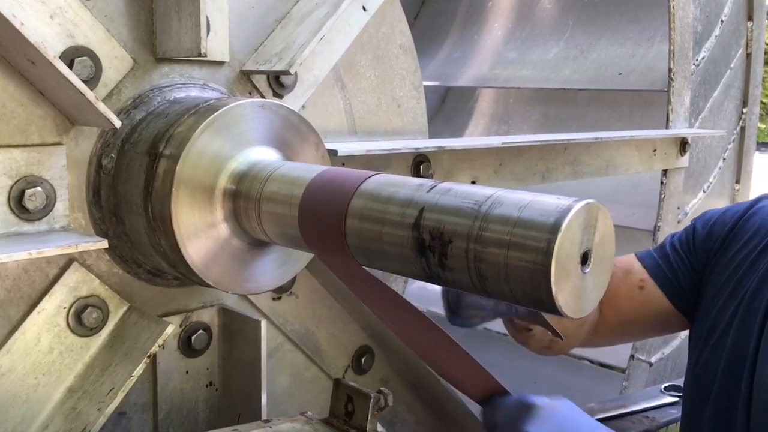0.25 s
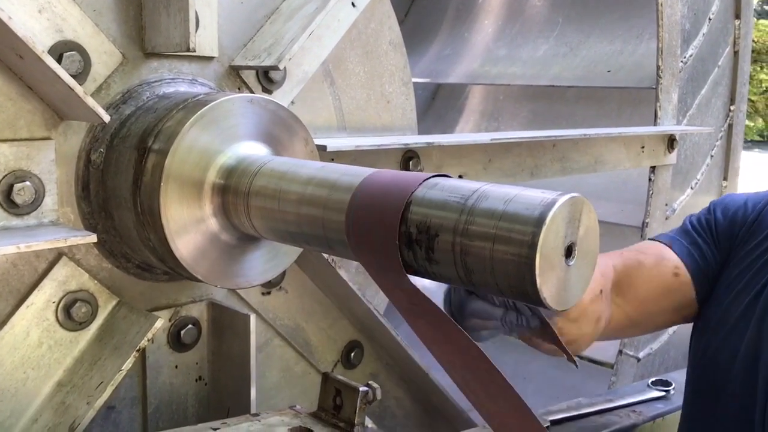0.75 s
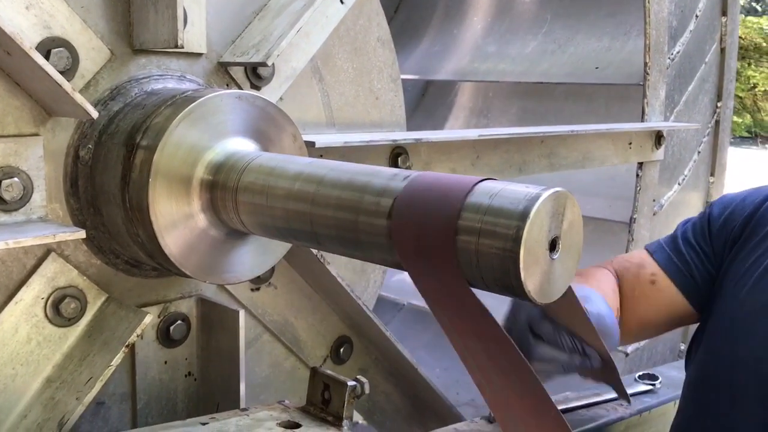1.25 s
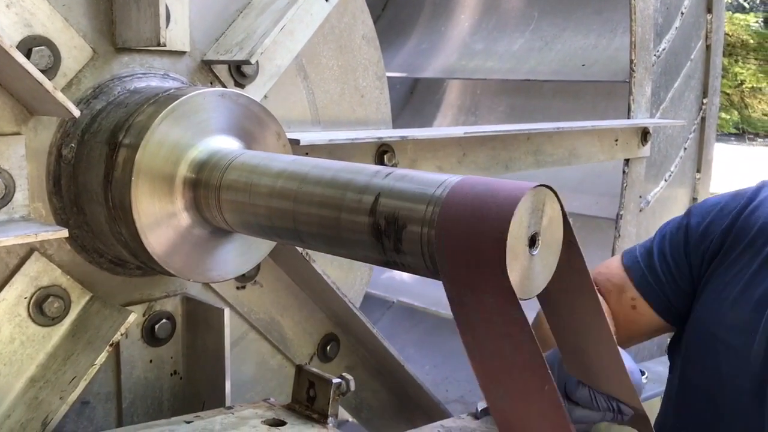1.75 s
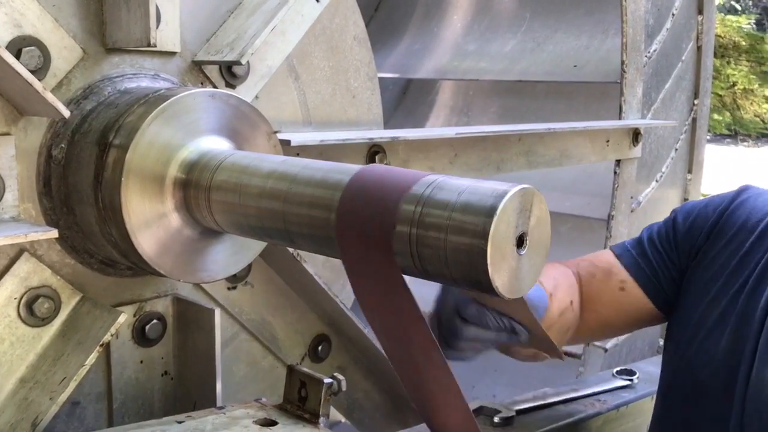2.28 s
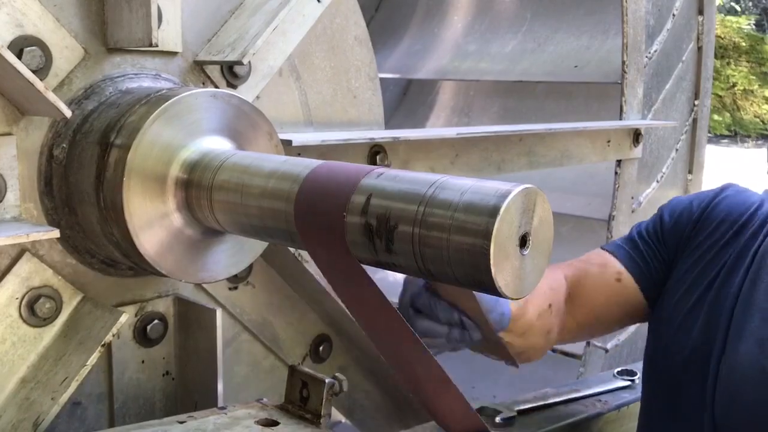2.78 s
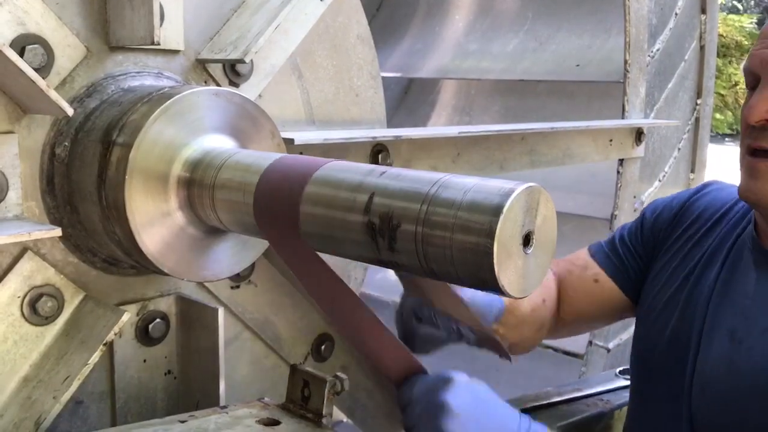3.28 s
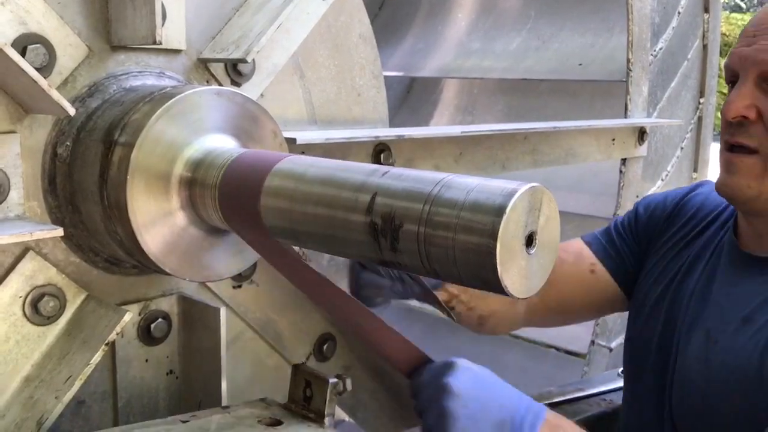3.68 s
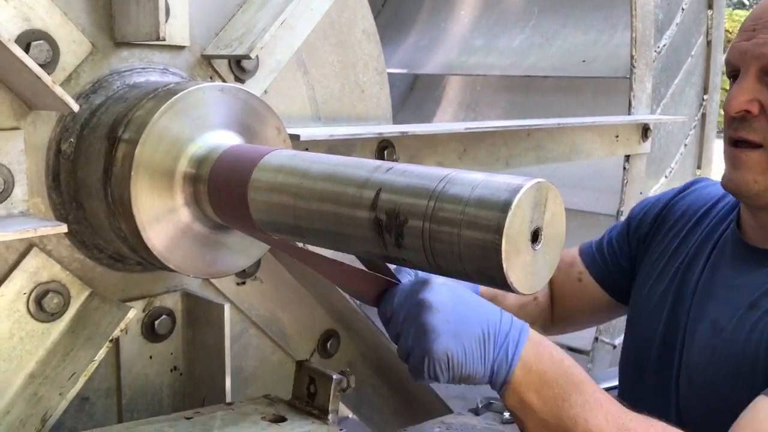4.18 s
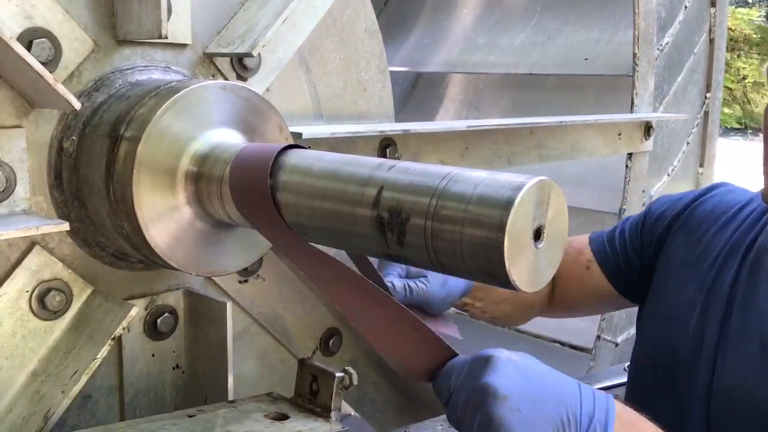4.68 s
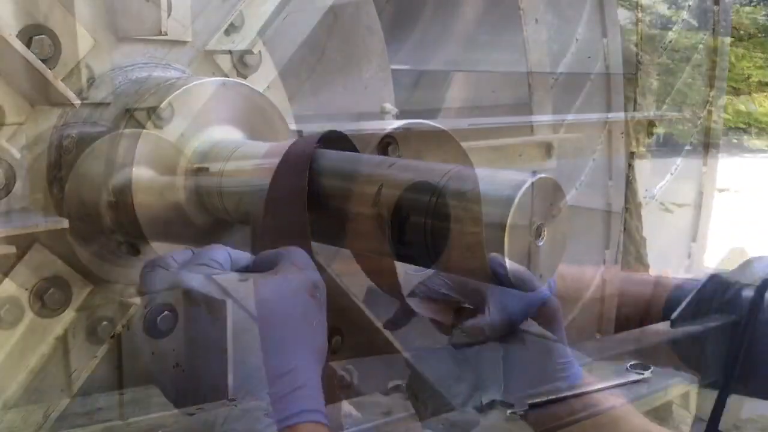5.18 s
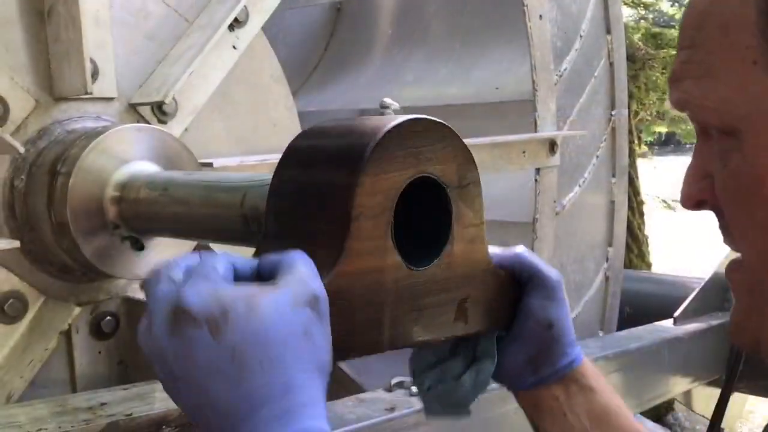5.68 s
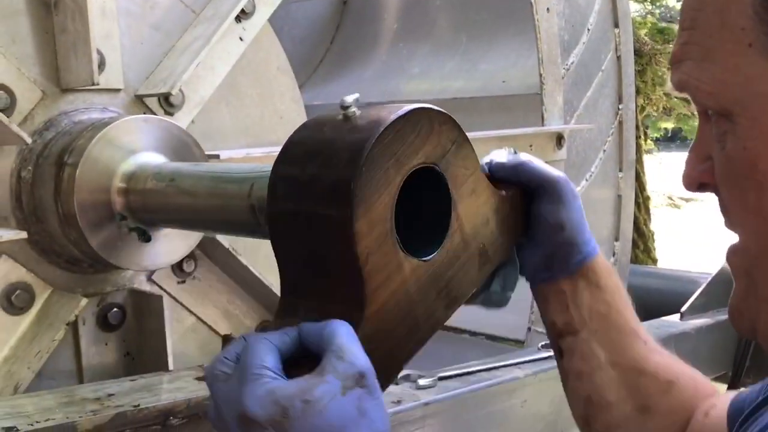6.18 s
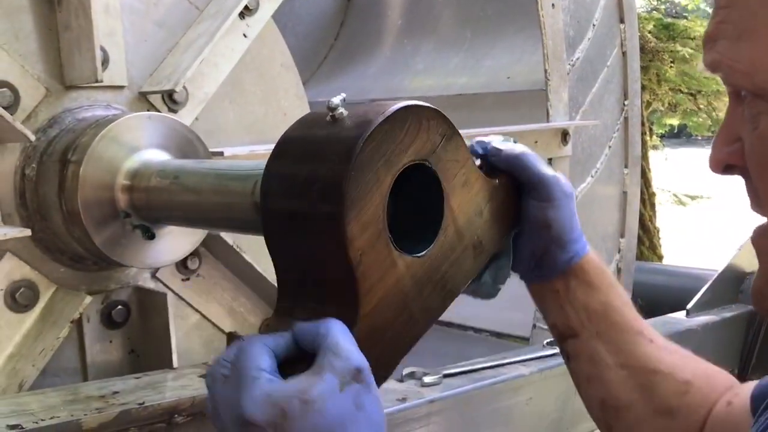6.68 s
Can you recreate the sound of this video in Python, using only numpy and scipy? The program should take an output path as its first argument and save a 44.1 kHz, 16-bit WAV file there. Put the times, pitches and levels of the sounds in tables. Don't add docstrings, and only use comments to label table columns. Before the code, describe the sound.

Outdoors and close up, sanding is already under way at 0 seconds: emery cloth drawn back and forth round a steel shaft. Each dry stroke lasts about 0.2 seconds, with tiny gaps at the turns, giving roughly five rasps per second. Fine grit fizzes brightly, the contact rasps, and the taut strip drums around 3 kHz; hard pulls add brief hums and rings, notably near 0.9, 2.1 and 3.5 seconds. The steel frame adds a very short echo. Strokes become gradually lighter and uneven until 4.55. A last, longer scrape swells around 4.7 and dies by 4.95. Running water, a steady broad wash underneath throughout, is then exposed. Small wind bumps come at 5.1 to 5.7, with faint glove rubs near 5.55, 5.8 and 6.1. Stronger low puffs buffet the microphone from 6.3 to 6.8, while the water continues to the end, near 6.9.

```python
import sys
import numpy as np
from scipy import signal
from scipy.fft import rfft, irfft
from scipy.io import wavfile
from scipy.ndimage import uniform_filter1d

SR = 44100
rng = np.random.default_rng(int(sys.argv[2]) if len(sys.argv) > 2 else 0)


def linear_from_db(decibels):
    return 10 ** (np.asarray(decibels, float) / 20)


def dump(signal):
    limited = np.clip(np.atleast_2d(signal).T, -1, 1)
    pcm = np.round(limited * 32767).astype(np.int16)
    wavfile.write(sys.argv[1], SR, pcm)


N = 306046


def evened(x):
    return x / np.sqrt(np.mean(x ** 2) + 1e-20)


def read(points, hz):
    f, value = np.transpose(points)
    return np.interp(np.log(hz + 1), np.log(f + 1), value)


def coloured(x, points):
    gain = linear_from_db(read(points, np.fft.rfftfreq(len(x), 1 / SR)))
    return evened(irfft(rfft(x) * gain, len(x)))


def patchy(x, db, bins, frames):
    z = signal.stft(x, nperseg=512, noverlap=384)[2]
    field = rng.standard_normal(z.shape)
    for _ in range(2):
        field = uniform_filter1d(field, bins, 0)
        field = uniform_filter1d(field, frames, 1)
    z = z * linear_from_db(db * evened(field))
    return evened(signal.istft(z, nperseg=512, noverlap=384)[1][:len(x)])


def resonate(x, hz, width):
    turn = np.exp(2j * np.pi * np.cumsum(hz * np.ones(len(x))) / SR)
    r = np.exp(-np.pi * width / SR)
    return 2 * (turn * signal.lfilter([1 - r], [1, -r], x / turn + 1e-18)).real


def bursts(x, rows, glide=0.):
    out = np.zeros(N)
    for s, length, db, hz, width in rows:
        span = slice(round(s * SR), round((s + length) * SR))
        path_hz = hz * (1 + glide * np.linspace(0, 1, len(x[span])))
        once = resonate(x[span], path_hz, width)
        spell = evened(resonate(once, path_hz, width))
        out[span] += linear_from_db(db) * spell * signal.windows.tukey(len(spell), .6)
    return out


def grit(per_s, spread_db):
    size = linear_from_db(spread_db * np.minimum(rng.exponential(1, N), 5)) * rng.choice([-1., 1.], N)
    return evened(size * (rng.random(N) < per_s / SR))


def hands():
    # start in seconds, end in seconds, sliding speed in dB, lean in dB from start to end,
    # jerk in dB at the start (+ breaks loose, - eases in).
    strokes = [(0.037, 0.227, -20.5, -10.5, -14.7), (0.248, 0.44, -24.6, 2, -8.5),
               (0.4647, 0.6415, -22.5, -5.5, 3.5), (0.66, 0.8506, -26.5, 1, -11),
               (0.8765, 1.053, -23.5, -6, 1.5), (1.067, 1.24, -23.0, -5, -13),
               (1.27, 1.463, -20, -10.5, -11), (1.4705, 1.6535, -28, -2, -12),
               (1.6774, 1.867, -25.3, -7, 0.5), (1.882, 2.0506, -26.5, 4, -5), (2.0797, 2.271, -30, 3, 11),
               (2.296, 2.459, -25.5, 1, 1.5), (2.4953, 2.6913, -29.5, -2.5, -13),
               (2.7075, 2.869, -28.8, -0.5, 4.5), (2.902, 3.082, -31.5, 0, -12.5),
               (3.102, 3.2754, -29.5, 3.5, 7), (3.309, 3.501, -33, 3.7, 9.1),
               (3.5224, 3.7129, -30.5, -1, 10.5), (3.736, 3.923, -34, 10, 2), (3.95, 4.123, -31.5, -3.8, 7),
               (4.152, 4.343, -29, -9.5, -20.2), (4.3654, 4.5512, -32, -4, -12)]
    # centre in seconds, half length in seconds, tension in dB,
    # strip resonance in Hz.
    tugs = [(0.0, 0.092, -29.5, 3100), (0.42, 0.018, -35.5, 3350), (0.48, .02, -30, 2870),
            (.52, 0.079, -32.5, 3040), (.683, 0.011, -37, 3390), (0.834, 0.014, -45, 3450),
            (.894, 0.036, -29.5, 3440), (1.278, 0.032, -29.5, 3420), (1.393, 0.071, -35, 3700),
            (1.494, 0.012, -39, 3230), (1.682, 0.032, -36, 3820), (1.842, 0.082, -39, 3820),
            (2.052, 0.034, -27, 3050), (2.096, 0.035, -24.5, 3450), (2.27, 0.028, -33.5, 2880),
            (2.316, 0.022, -28, 3200), (2.382, 0.081, -31, 3260), (2.517, .015, -37, 3540),
            (2.67, 0.028, -42, 2810), (2.761, 0.069, -30, 3230), (3.074, 0.023, -52, 3300),
            (3.186, .088, -30.5, 2980), (3.317, 0.024, -28, 2830), (3.48, 0.023, -47, 2980),
            (3.56, 0.051, -30.5, 3000), (3.923, 0.02, -32, 2650), (3.957, 0.021, -30.5, 3470),
            (4.175, 0.013, -41, 3500), (4.311, 0.024, -41.5, 3600), (4.382, 0.03, -37.5, 3000)]
    # time in seconds, sliding speed in dB, tension in dB,
    # strip resonance in Hz.
    last_stroke = [
        (4.593, -71, -65, 3400),
        (4.61, -41, -39.5, 3380),
        (4.654, -29.5, -36.5, 3350),
        (4.746, -27, -30.5, 2920),
        (4.792, -33, -31, 2840),
        (4.855, -45, -35.5, 2540),
        (4.885, -53, -48.5, 2500),
        (4.944, -51, -56, 2500),
        (4.97, -85, -75, 2500),
    ]
    set_off_s, stop_s, jerk_s, edge_power = 0.0074, 0.0085, 0.036, 2.92
    set_off_per_jerk = 0.021
    stick_s_per_jerk = 0.00039
    stop_per_lean = 0.09
    slack_db, slack_share, slack_hz = -30.5, 0.34, 3300
    tug_shape, tug_edge = 2.3, 0.18
    creep_db = -34.5

    t = np.arange(N) / SR
    s, last_speed, last_pull, last_hz = np.transpose(last_stroke)
    speed_db = np.interp(t, s, last_speed, -120, -120)
    edge_db = np.full(N, -400.)
    for start, end, db, lean_db, jerk_db in strokes:
        span = slice(round(start * SR), round(end * SR))
        since = t[span] - t[span][0]
        rise_s = set_off_s * np.exp(-set_off_per_jerk * max(jerk_db, 0))
        fall_s = stop_s * np.exp(-stop_per_lean * lean_db)
        edges = (1 - np.exp(-since / rise_s)) * (1 - np.exp((since - since[-1]) / fall_s))
        edges = edges * np.clip((since - stick_s_per_jerk * jerk_db) / .002, 0, 1)
        edge_db[span] = edge_power * 20 * np.log10(edges + 1e-3)
        lean = lean_db * (since / since[-1] - .5)
        speed_db[span] = db + lean + jerk_db * np.exp(-since / jerk_s) + edge_db[span]
    creep = uniform_filter1d(linear_from_db(speed_db) ** 2, size=2600) * linear_from_db(creep_db) ** 2

    pull = linear_from_db(slack_share * speed_db + slack_db) ** 2 * (edge_db > -400)
    hz = pull * slack_hz
    for centre, half, db, tug_hz in tugs:
        tug = linear_from_db(db + tug_edge * edge_db) ** 2 * np.exp(-abs((t - centre) / half) ** tug_shape)
        pull = pull + tug
        hz = hz + tug * tug_hz
    last = linear_from_db(np.interp(t, s, last_pull, -120, -120)) ** 2
    hz = hz + last * np.interp(t, s, last_hz)
    pull = pull + last
    return 10 * np.log10(linear_from_db(speed_db) ** 2 + abs(creep)), 10 * np.log10(pull), hz / pull


def emery():
    # frequency in Hz, level in dB per Hz.
    fizz_spectrum = [(5880, -45), (10000, -0.5), (10400, 0), (13000, 8.5), (15100, 8.5), (15600, 4.5)]
    rasp_spectrum = [(2820, -44), (4800, -11.5), (5310, -3), (7720, 0.5), (8830, 1.5), (10500, -2.5),
                     (13600, -14), (22000, -120)]
    strip_spectrum = [(650, -45), (1100, -7.5), (1610, -5.5), (1980, -3), (2140, -4), (3380, -4),
                      (4380, -3), (5000, -2), (6500, -15), (11000, -120)]
    # start in seconds, length in seconds, level in dB,
    # pitch in Hz.
    hum_rows = [(.1, 0.077, -50, 1890), (0.472, 0.09, -52, 2200), (0.877, 0.042, -43, 1220),
                (1.31, 0.15, -52, 1650), (1.99, .06, -52, 2000), (2.086, .06, -45, 1930),
                (2.31, 0.13, -51, 2230), (2.724, 0.092, -63, 2000), (3.12, 0.19, -52, 2040),
                (3.54, 0.077, -38, 2530), (4.723, 0.16, -47, 2450)]
    # start in seconds,
    # length in seconds, level in dB, pitch in Hz.
    ring_rows = [(0.035, 0.057, -40, 3800), (.06, .1, -41, 8700), (0.473, .08, -33, 8700),
                 (0.883, 0.075, -41, 3270), (.885, .06, -33, 8800), (1.268, 0.067, -38, 3350),
                 (1.29, .12, -48, 12600), (2.003, .05, -48, 3400), (2.088, 0.039, -39, 3600),
                 (2.09, 0.057, -29.5, 8850), (2.3, 0.14, -37, 8500), (2.718, 0.083, -35, 5120),
                 (2.72, 0.092, -39, 8950), (3.115, 0.17, -40, 8750), (3.12, 0.16, -36, 11900),
                 (3.152, 0.11, -43, 3350), (3.53, .03, -38, 11800), (3.56, .09, -42, 8850),
                 (3.57, .09, -37, 12300), (3.952, .04, -29, 11600), (3.952, 0.033, -39, 9400),
                 (4.65, .1, -35, 12400), (4.75, 0.083, -39.5, 4260), (1.28, .1, -38, 5900),
                 (2.078, 0.046, -38, 5500), (.07, 0.11, -35, 12300), (3.877, .045, -44, 2460),
                 (3.83, .08, -40, 13000), (4.606, 0.087, -46, 3280)]
    rasp_share, rasp_offset_db = 0.51, 0.26

    speed_db, pull_db, tension_hz = hands()
    fine = grit(per_s=24000, spread_db=2.4)
    coarse = grit(per_s=140, spread_db=-3.0)
    flutter = evened(uniform_filter1d(rng.standard_normal(N), size=300))
    clicks = (fine + .09 * coarse) * linear_from_db(0.79 * flutter)

    fizz = patchy(coloured(clicks, fizz_spectrum), db=1.5, bins=5, frames=10)
    rasp = patchy(coloured(clicks, rasp_spectrum), db=1.0, bins=3, frames=12)
    broad = evened(resonate(clicks, tension_hz, 1370.0)) * 1.38
    narrow = evened(resonate(clicks, tension_hz, 120.)) * 0.028
    drum = patchy(coloured(clicks + broad + narrow, strip_spectrum), db=2.4, bins=2, frames=10)
    rasp_db = rasp_share * speed_db + (1 - rasp_share) * pull_db + rasp_offset_db

    hums = bursts(clicks, [(*row, 350.) for row in hum_rows])
    rings = bursts(clicks, [(*row, 0.12 * row[3]) for row in ring_rows], glide=0.03)
    return fizz * linear_from_db(speed_db) + rasp * linear_from_db(rasp_db) + drum * linear_from_db(pull_db) + hums + rings


def frame_echo(x):
    t = np.arange(6000) / SR
    hits = rng.choice([-1., 1.], 6000) * (rng.random(6000) < .06)
    taps = hits * linear_from_db(-60 * t / 0.088) * (t > .002)
    return signal.oaconvolve(x, taps / np.linalg.norm(taps))[:N]


def water():
    # frequency in Hz, level in dB per Hz.
    wash_spectrum = [(18, -37), (30, -42), (114, -9.5), (192, 0), (370, 0), (520, -4), (658, -1), (900, 0),
                     (3330, -13.5), (5480, -20), (7700, -26.5), (9240, -29), (10500, -31.5), (14400, -33),
                     (15600, -34)]
    # time in seconds, water level in dB, brightness in dB per octave above 1 kHz.
    water_path = [(0, -43, 2), (2, -42.5, 2), (4.5, -42.5, 1.5), (4.95, -43.5, 1.3), (5.2, -44.5, 1.45),
                  (5.7, -43, 1.5), (6.3, -42.5, 0.86), (6.94, -41.5, 0.7)]
    s, db, bright = np.transpose(water_path)
    wash = patchy(coloured(rng.standard_normal(N), wash_spectrum), db=1.47, bins=2, frames=16)
    hz, t, z = signal.stft(wash, SR, nperseg=1024)
    octaves = np.log2(np.maximum(hz, 1000) / 1000)
    tilt_db = np.outer(octaves, np.interp(t, s, bright))
    return signal.istft(z * linear_from_db(tilt_db + np.interp(t, s, db)), SR, nperseg=1024)[1][:N]


def wind():
    # time in seconds, rumble level in dB.
    rumble_path = [(0, -60.5), (.7, -59.5), (1.5, -58), (2.5, -58.5), (4.9, -58), (5.1, -57), (5.4, -61),
                   (5.8, -61), (6.1, -55), (6.2, -53), (6.38, -43.5), (6.5, -47), (6.57, -54), (6.8, -51),
                   (6.94, -52)]
    # time in seconds, moan level in dB, pitch in Hz.
    moan_path = [(5.55, -77, 200), (5.7, -44, 200), (5.9, -52.5, 185), (6.0, -54, 191), (6.17, -49, 198),
                 (6.4, -48, 248), (6.55, -53.5, 242), (6.94, -53, 240)]
    # time in seconds, peak in dB, pitch in Hz, length in cycles.
    puffs = [(5.055, -44, 60, 1.3), (5.12, -38, 180, 3.2), (5.245, -42.5, 65, 2.2), (5.62, -45, 55, 2.2),
             (5.665, -44, 55, 2), (6.105, -40, 65, 2), (6.265, -40, 75, 2), (6.313, -33, 65, 1.5),
             (6.328, -28, 96, 3.1), (6.444, -33, 95.5, 2.6), (6.475, -35, 60, 2.2),
             (6.641, -30.5, 100, 2.2), (6.727, -25.5, 72, 1.9), (6.759, -34, 85, 1.9)]
    t = np.arange(N) / SR
    rumble_spectrum = [(15, -40), (35, -6.5), (60, 0), (105, 1.5), (140, 0.0), (260, -35), (900, -90)]
    rumble = coloured(rng.standard_normal(N), rumble_spectrum)
    out = rumble * linear_from_db(np.interp(t, *np.transpose(rumble_path)))
    s, db, hz = np.transpose(moan_path)
    moan = resonate(rng.standard_normal(N), np.interp(t, s, hz), 49.0)
    out += evened(moan) * linear_from_db(np.interp(t, s, db))
    for s, db, hz, cycles in puffs:
        turns = (t - s) * hz
        out += linear_from_db(db) * np.exp(-(2.7 * turns / cycles) ** 2) * np.sin(-2 * np.pi * turns)
    return out


def gloves():
    # start in seconds, length in seconds, level in dB, centre in Hz, width in Hz.
    rustles = [
        (0, .01, -38, 8950, 9000),
        (2.055, 0.052, -43, 9000, 9000),
        (4.125, .016, -56, 9000, 9000),
        (5.54, .006, -56, 6000, 6000),
        (5.68, .006, -62, 12000, 6000),
        (5.762, 0.051, -52.5, 11000, 8000),
        (5.89, .01, -63, 9000, 6000),
        (6.083, .008, -51, 10000, 9000),
        (6.22, .03, -63, 11000, 8000),
        (6.357, .006, -74, 6000, 6000),
    ]
    return bursts(grit(per_s=4100, spread_db=-12.0), rustles)


def scene():
    cloth = emery()
    mix = cloth + linear_from_db(-14.5) * frame_echo(cloth) + water() + wind() + gloves()
    return np.tile(mix, (2, 1))


def band_limit(x):
    return signal.sosfilt(signal.butter(12, 16980, fs=SR, output="sos"), x)


def record(dry):
    # frequency in Hz, width in Hz, gain in dB.
    notches = [(4920, 270, -4), (7700, 410, -4), (10400, 400, -7)]
    # time in seconds, low edge in Hz, high edge in Hz.
    swaps = [(0.775, 10980, 12450), (0.94, 4260, 5080), (0.94, 5680, 10340), (0.94, 12360, 13820),
             (1.753, 13090, 15850), (2.174, 10290, 11710), (2.821, 4180, 5170), (2.821, 8910, 10340),
             (2.821, 11020, 12450), (2.821, 13090, 15160), (3.425, 4610, 5680), (4.47, 4220, 5640),
             (4.47, 6850, 8270), (5.817, 6240, 8270), (5.817, 9600, 11020), (5.817, 13780, 15160),
             (6.049, 6890, 9650), (6.049, 12400, 14470), (6.51, 10340, 12450), (6.51, 13050, 14510)]
    hz, t, z = signal.stft(dry, SR, nperseg=512, noverlap=448)
    other = signal.stft(rng.standard_normal(N), SR, nperseg=512, noverlap=448)[2]
    housing_db = sum(db / (1 + (2 * (hz - f) / width) ** 2) for f, width, db in notches)
    z = z * linear_from_db(housing_db)[:, None]
    for s, low, high in swaps:
        band = (hz > low) & (hz < high)
        now = np.clip(3 - abs(t - s) / .005, 0, 1)
        power = np.mean(abs(z[0][band]) ** 2 * now)
        level = np.sqrt(power / np.mean(abs(other[band]) ** 2 * now))
        side = level * other[band] * now * 0.78
        z[:, band] = z[:, band] * np.sqrt(1 - now ** 2 / 2) + [side, -side]
    heard = signal.istft(z, SR, nperseg=512, noverlap=448)[1][:, :N]
    edge = signal.firwin(1023, 15830, window=("kaiser", 6), fs=SR)
    return band_limit(signal.oaconvolve(heard, edge[None], "same"))


dry = scene()
out = record(dry)
dump(out)
```